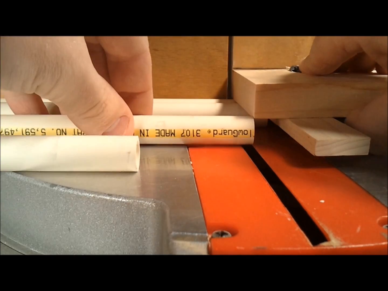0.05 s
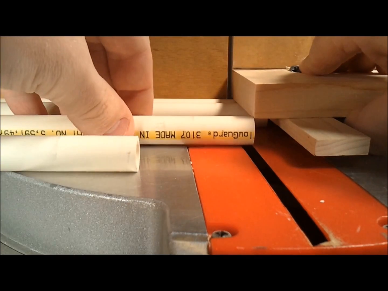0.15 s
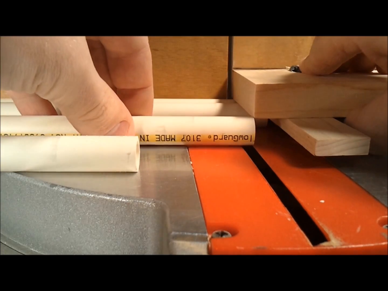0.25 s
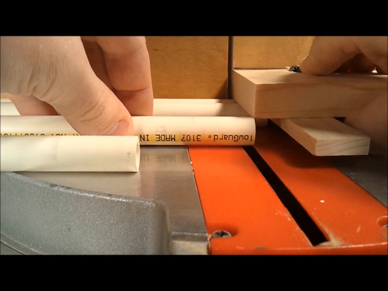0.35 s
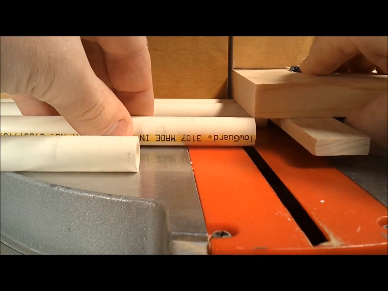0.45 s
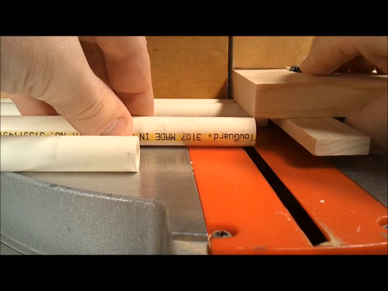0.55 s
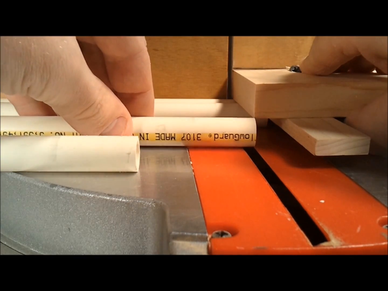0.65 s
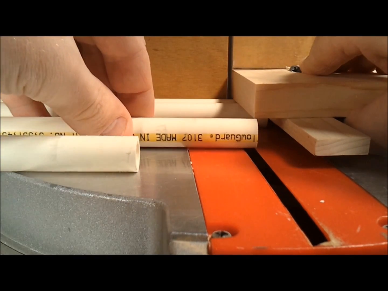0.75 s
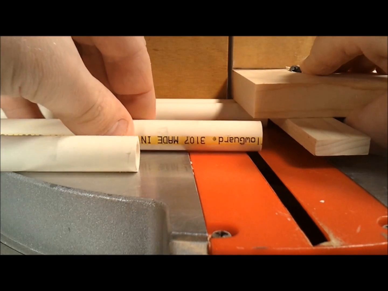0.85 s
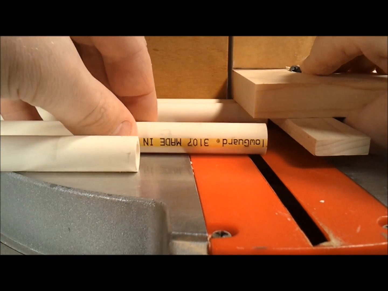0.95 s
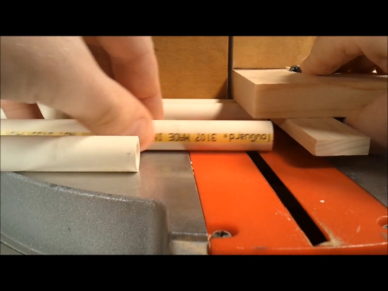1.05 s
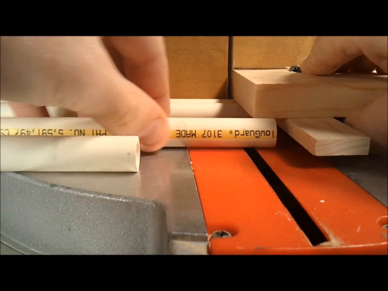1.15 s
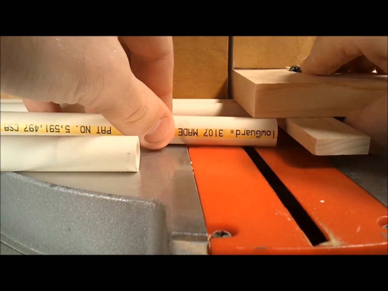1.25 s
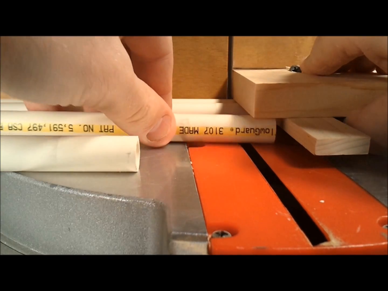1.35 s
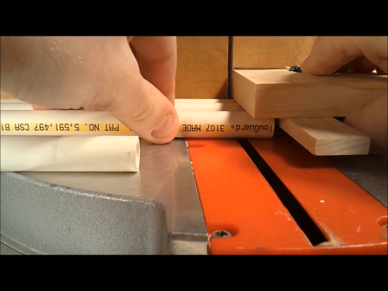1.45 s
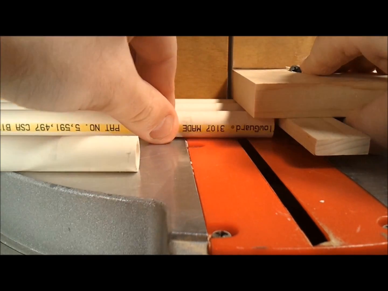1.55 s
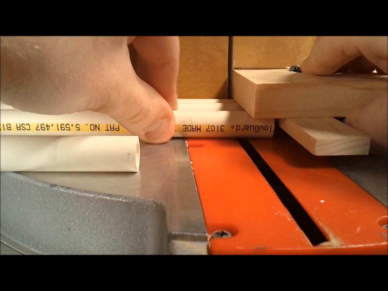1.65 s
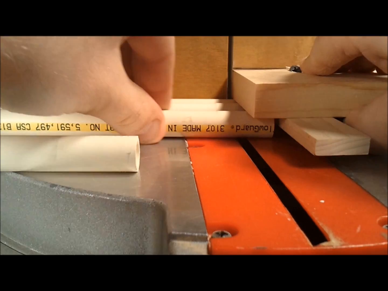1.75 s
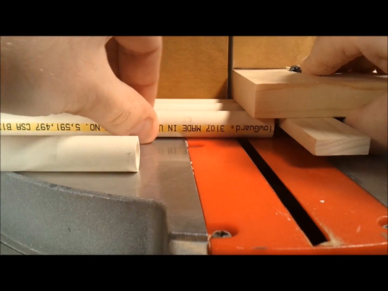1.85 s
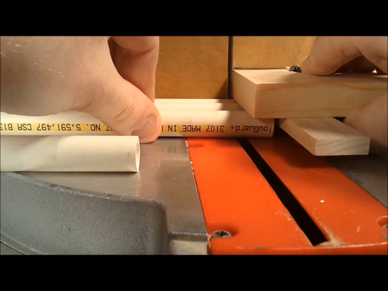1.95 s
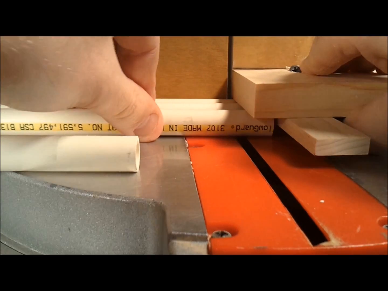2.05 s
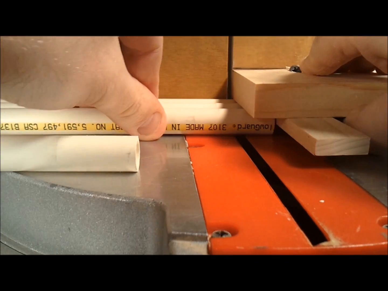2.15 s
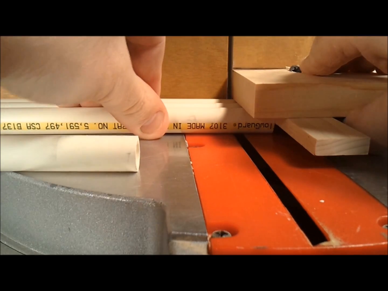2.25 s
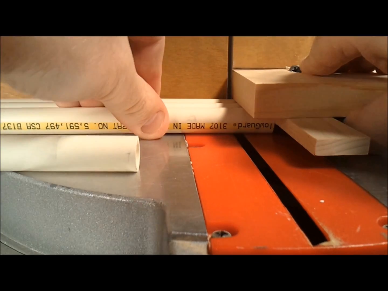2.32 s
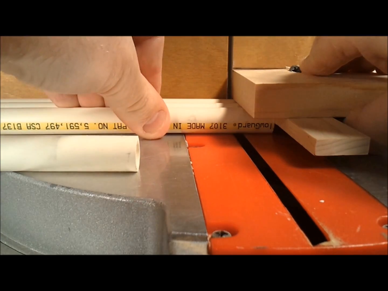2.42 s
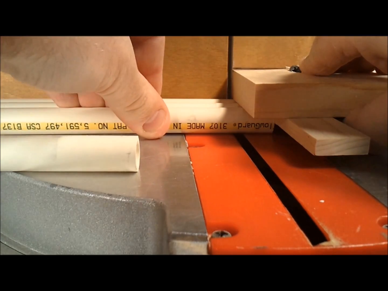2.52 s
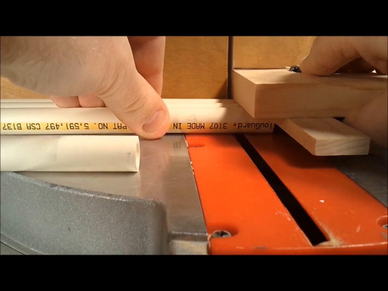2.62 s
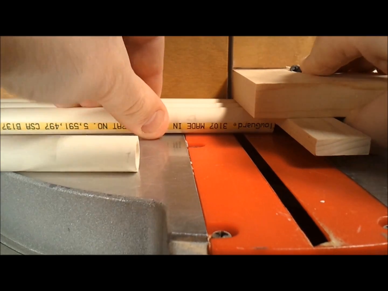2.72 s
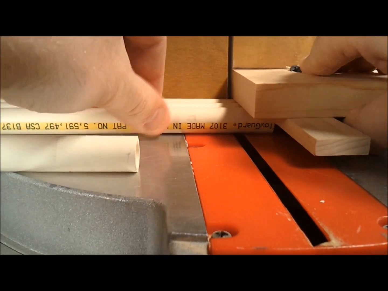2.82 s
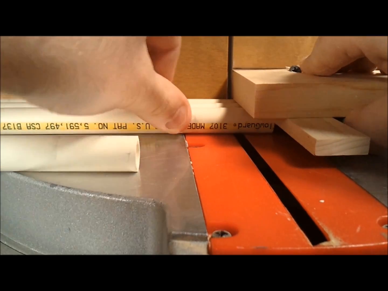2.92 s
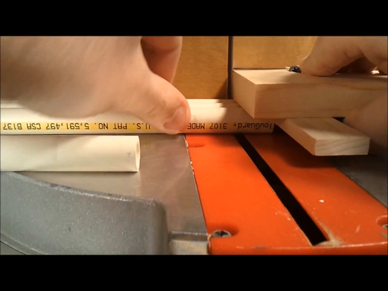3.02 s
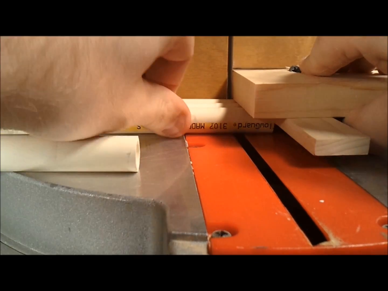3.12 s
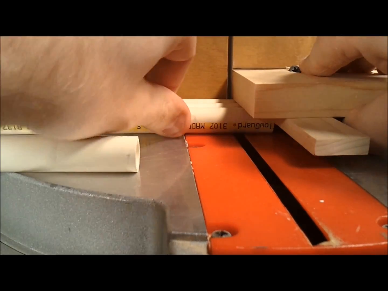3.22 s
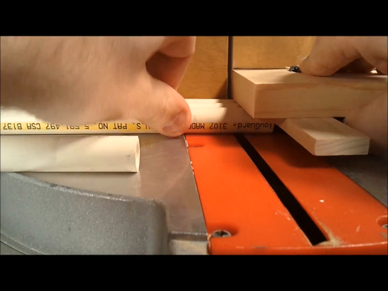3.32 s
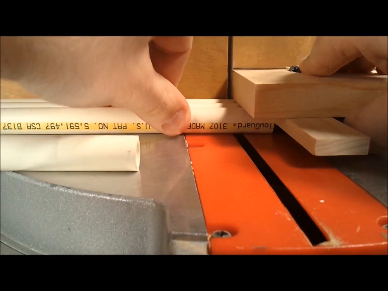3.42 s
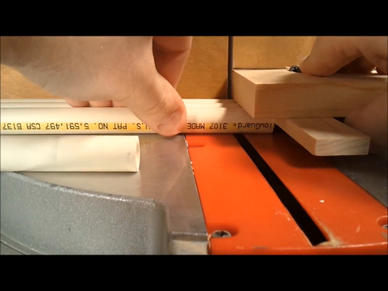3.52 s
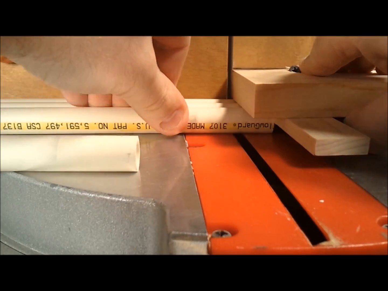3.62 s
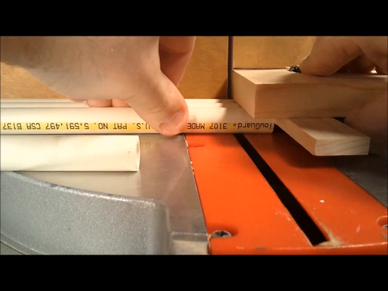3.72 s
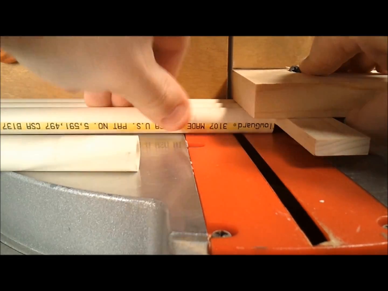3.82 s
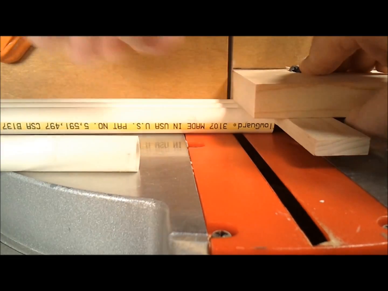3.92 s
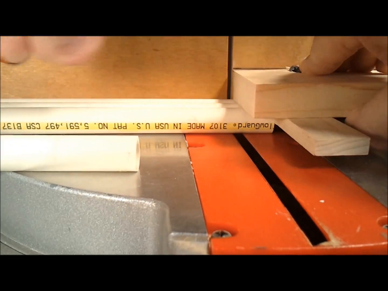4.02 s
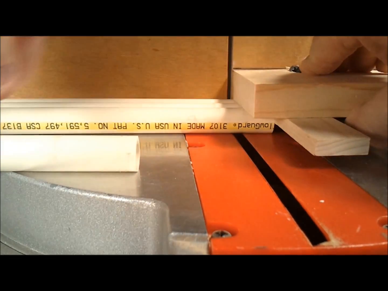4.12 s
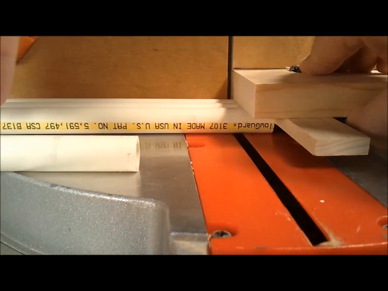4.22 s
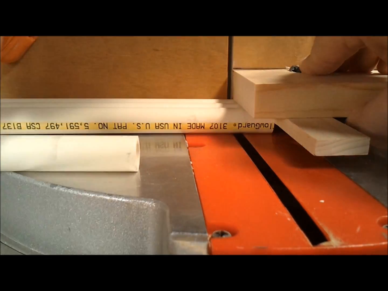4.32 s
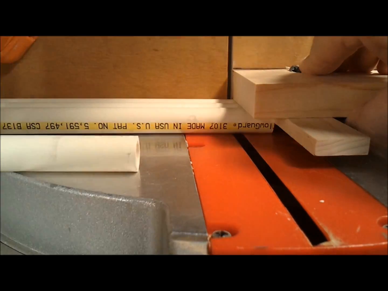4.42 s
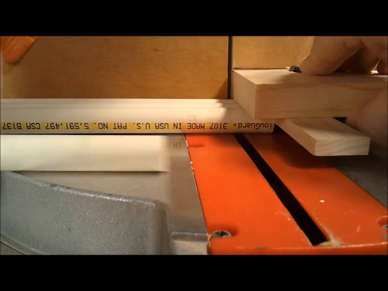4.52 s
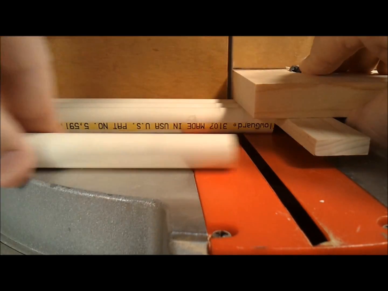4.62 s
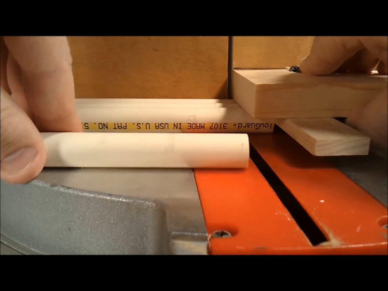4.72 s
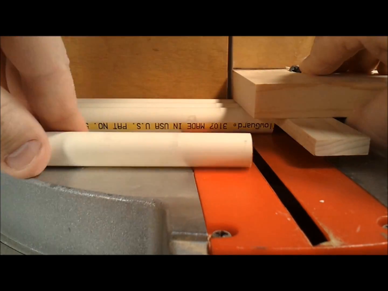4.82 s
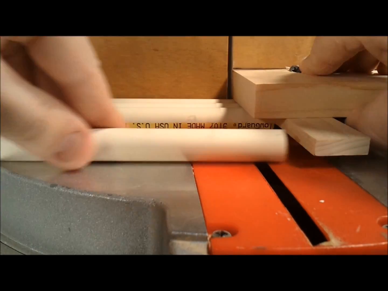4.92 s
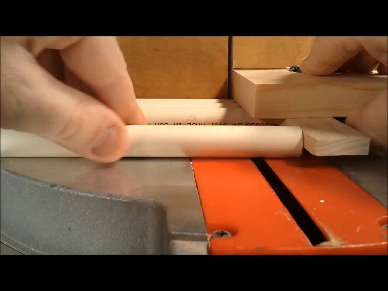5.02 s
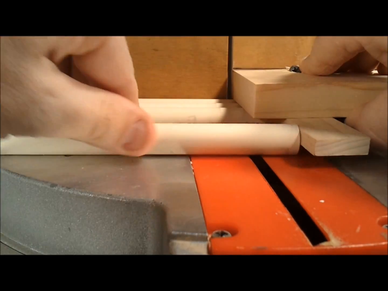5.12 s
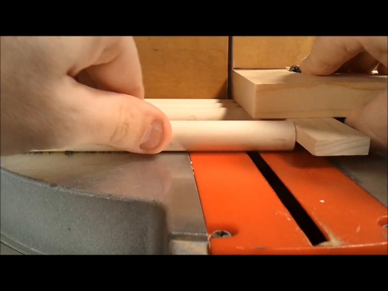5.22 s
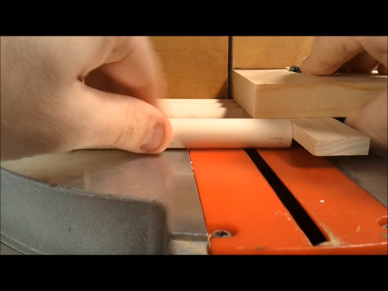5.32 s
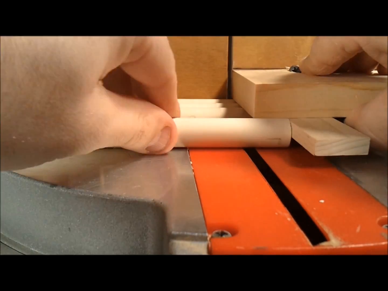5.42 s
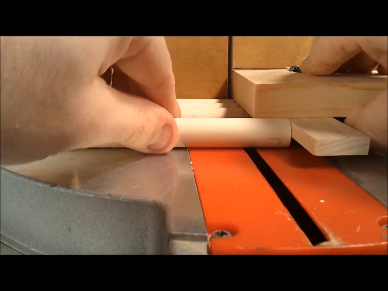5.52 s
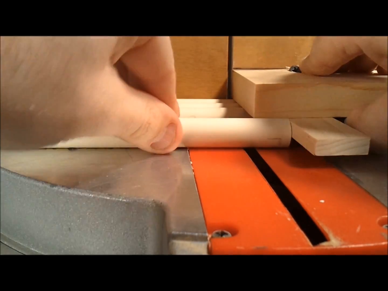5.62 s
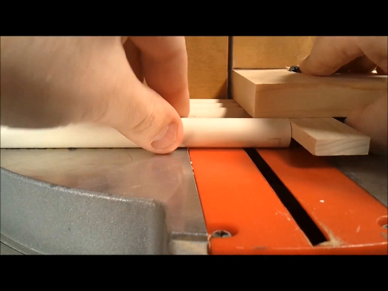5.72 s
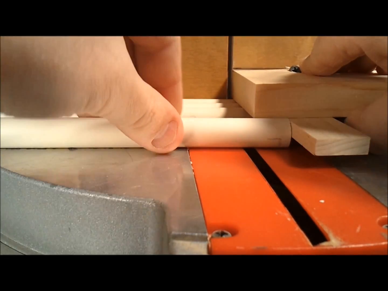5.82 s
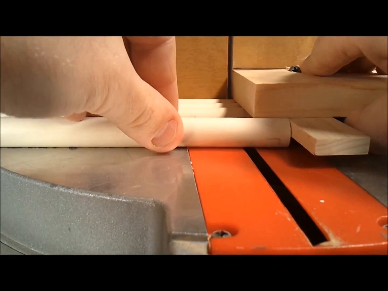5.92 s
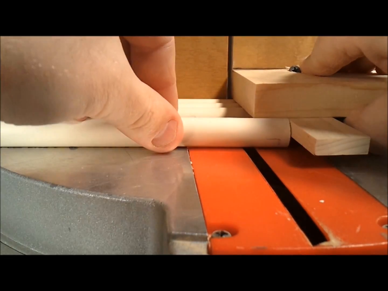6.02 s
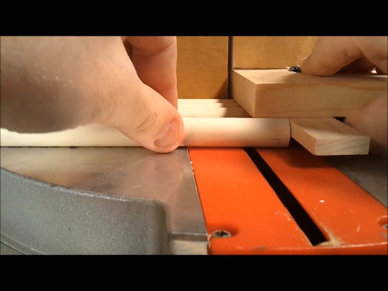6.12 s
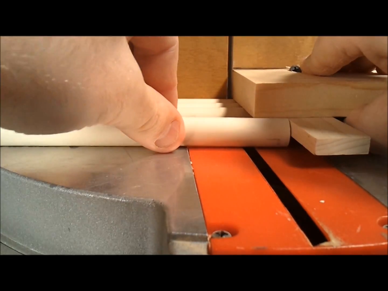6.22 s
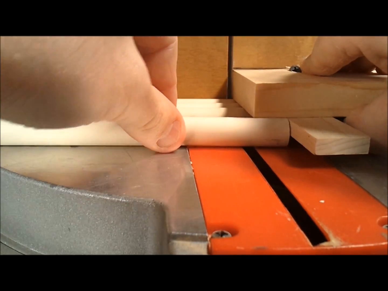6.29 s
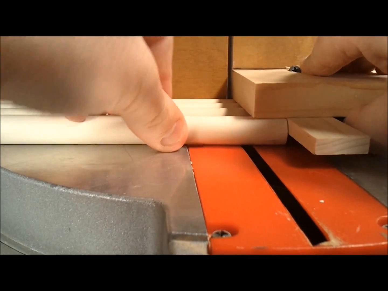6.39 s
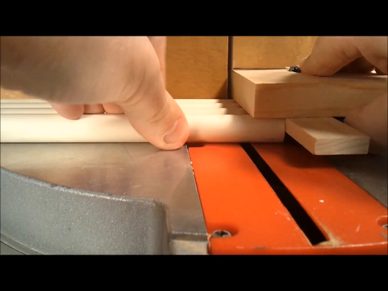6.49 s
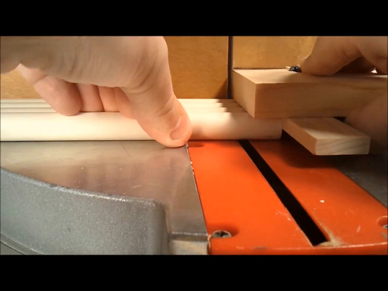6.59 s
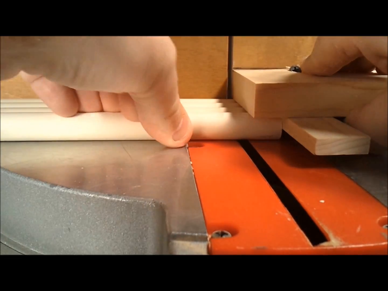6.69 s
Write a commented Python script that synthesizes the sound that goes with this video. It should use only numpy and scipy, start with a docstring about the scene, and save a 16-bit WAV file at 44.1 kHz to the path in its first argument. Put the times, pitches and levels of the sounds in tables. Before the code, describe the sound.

Close, dry handling of plastic pipes on an idle saw's steel table: faint rubs, one loud bright clack, a flurry of hissy scrapes, squeaks and hollow knocks, then sparse light taps with thin pings. After a quiet pause another pipe scrapes in with a hollow rubbing tone, lands with a duller thud, is adjusted, and finally clacks end-on against the wood. Small room, slightly dull recording, steady soft noise floor.

```python
"""In a small workshop, lengths of plastic pipe are slid by hand across the metal table of an idle saw, close
to the microphone. Each push is noise shaped as surface hiss and as slips ringing the pipe; squeaks are bands
of noise. Clacks against pipes and a wooden stop, and drops on the table, are damped modes over short noise;
the thin steel pings faintly. The room answers with decaying noise tails, over a floor of noise and low hum."""
import sys
import numpy as np
from scipy import signal
from scipy.fft import rfft, irfft, next_fast_len
from scipy.io import wavfile
from scipy.ndimage import uniform_filter1d, map_coordinates

SR = 44100
rng = np.random.default_rng(int(sys.argv[2]) if len(sys.argv) > 2 else 0)


def transcribe(signal):
    """Save signal, clipped to [-1, 1], as a 16-bit WAV file at the path in sys.argv[1]."""
    frames = np.atleast_2d(signal).T
    limited = np.clip(frames, -1, 1)
    pcm = np.round(limited * 32767).astype(np.int16)
    wavfile.write(sys.argv[1], SR, pcm)


N = 297675


def amp(db):
    """Decibels to gain."""
    return 10 ** (np.asarray(db) / 20)


def unit(x):
    """Scaled to rms 1."""
    return x / np.sqrt(np.mean(x ** 2) + 1e-20)


def along(points, hz):
    """(Hz, value) points read on a log frequency axis."""
    f, v = np.transpose(points)
    return np.interp(np.log(hz + 1), np.log(f + 1), v)


def wobble(rate):
    """A smooth random curve, rate knots a second."""
    knots = rng.standard_normal(int(N * rate / SR) + 4)
    return map_coordinates(knots, [np.arange(N) * rate / SR])


def filtered(x, response):
    """x times a response of frequency."""
    m = next_fast_len(len(x) + SR // 10)
    hz = np.fft.rfftfreq(m, 1 / SR)
    return irfft(rfft(x, m) * response(hz), m)[:len(x)]


def coloured(x, spectrum):
    """x with a (Hz, dB) spectrum, at rms 1."""
    return unit(filtered(x, lambda hz: amp(along(spectrum, hz))))


def add(track, s, sound):
    """Mixes a sound into the track at a time in seconds."""
    part = track[round(s * SR):][:len(sound)]
    part += sound[:len(part)]


def background():
    """Steady room noise with a weak electrical hum whose partials waver in phase."""
    # Partials of the hum. Each row: frequency in Hz, rms level in dB.
    hum_partials = [(120, -87.5), (180, -88), (258, -86), (360.7, -83)]
    # Spectrum of the room noise. Each row: frequency in Hz, relative level in dB.
    floor_spectrum = [(20, 1.5), (50, 1.5), (140, 1.5), (400, 0.5), (650, -3), (1000, -6.5), (2000, -9.5),
                      (4000, -13.5), (7000, -14)]
    floor_db = -60
    t = np.arange(N) / SR
    hum = np.zeros(N)
    for hz, db in hum_partials:
        hum += amp(db) * np.sqrt(2) * np.sin(2 * np.pi * hz * t + .6 * wobble(4))
    return hum + amp(floor_db) * coloured(rng.standard_normal(N), floor_spectrum)


def asperities(rate, spread_db, smooth_db):
    """Tiny slips of unequal size, rate a second on average, over the smooth rub of the surface."""
    happens = rng.random(N) < rate / SR
    sizes = rng.standard_normal(N) * amp(spread_db * rng.standard_normal(N))
    return unit(happens * sizes) + amp(smooth_db) * rng.standard_normal(N)


def rubbed(resonances):
    """Tiny slips ringing a pipe, at rms 1; the resonances drift as the contact and the grip move."""
    def tube(f):
        response = 0
        for k, (centre, width, db) in enumerate(resonances):
            resonance = 1j * f * width / (centre * centre - f * f + 1j * f * width)
            response = response + (-1) ** k * amp(db) * resonance  # neighbours in opposite phase
        return response

    ringing = filtered(asperities(rate=700, spread_db=3, smooth_db=-4), tube)
    # reading the sound slightly fast or slow, by about 1 %, moves every resonance together
    drift = np.cumsum(.011 * wobble(16))
    return unit(map_coordinates(ringing, [np.arange(N) + drift], order=3, mode="reflect"))


def patchy(x, depth_db):
    """The colour of a rub shifts from one spot of the surface to the next."""
    z = signal.stft(x, nperseg=512)[2]
    field = uniform_filter1d(rng.standard_normal(z.shape), 5, 0)  # smooth across frequency
    field = uniform_filter1d(field, 7, 1)  # and along time
    patched = signal.istft(z * amp(depth_db * unit(field)), nperseg=512)[1]
    return unit(patched[:N])


def push(t, length, swell_db):
    """Level of one push: it gathers speed, swells or fades evenly, and dies away once the hand eases off."""
    get_going_s, come_to_rest_s = .0115, .018
    going = 1 / (1 + np.exp(-t / get_going_s))
    swell = amp(swell_db * (np.clip(t / length, 0, 1) - .5))
    resting = np.exp(-np.maximum(t - length, 0) / come_to_rest_s)
    return going * swell * resting


def sliding():
    """The pipe scrapes with each push: the contact hisses and the hollow length resonates."""
    # Pushes of the hand. Each row: start in seconds, length in seconds, surface hiss in dB, pipe body in dB,
    # swell from start to end in dB; both levels are before the trims and the unsteady grip.
    strokes = [(0.15, .07, -60, -60.5, 10), (0.555, .05, -61.5, -60.5, 0), (0.681, .012, -46, -46, 0),
               (0.793, .135, -48.2, -47.8, -2), (0.98, .07, -52.5, -52, 0), (1.063, .055, -43.7, -47, -5),
               (1.2, .09, -43, -55, -2), (1.335, .105, -42.5, -57.5, 2), (1.47, .13, -50.3, -57, -6),
               (1.68, .16, -57.5, -68, -2), (2.037, .05, -45.5, -60, 2), (2.12, .125, -53, -57.5, 2),
               (2.76, .13, -59.3, -63, -4), (3.465, .025, -58.5, -72, 0), (3.74, .07, -61, -68, 3),
               (4.436, .094, -49.5, -51.5, 17), (4.602, .047, -43.5, -44.3, 4),
               (4.715, .012, -52, -39.5, 0), (4.808, .162, -47.5, -45.3, 3), (5, .285, -52.3, -46.7, 0),
               (5.29, .018, -56, -42, 0), (5.36, .14, -57, -60.5, -6), (5.62, .16, -62.3, -76, -5),
               (5.845, .05, -58, -53.5, 0), (6.315, .042, -47, -51.5, 2), (6.4, .08, -42.8, -49, 7),
               (6.51, .11, -54, -68, -10)]
    # Spectrum of the surface hiss. Each row: frequency in Hz, relative level in dB.
    hiss_spectrum = [(200, -38), (1000, 0.5), (2400, -3), (3200, -2.5), (3900, -2), (4700, -1), (5200, 0.5),
                     (5700, 4), (6800, 8), (7500, -9.5)]
    # Resonances that rubbing excites, by how the pipe lies and is held: a first pipe, the picking up of
    # another, and the second pipe. Each row: frequency in Hz, width in Hz, relative level in dB.
    first_pipe = [(288, 110, -12), (432, 70, -9.5), (567, 73, -5.5), (903, 45, 0.5), (979, 60, 0),
                  (1144, 48, -0.5), (1743, 98, -7), (2026, 57, -9.5), (3550, 76, -12), (4630, 130, -7.5),
                  (5570, 200, -13)]
    picking_up = [(290, 130, -22), (813, 96, -9), (982, 75, 1.5), (1160, 130, -5.5), (1516, 70, -6),
                  (1680, 49, -3.5), (1970, 170, -6), (2264, 300, -17.5), (3230, 66, -16.5),
                  (4190, 150, -15)]
    second_pipe = [(165, 67, -7.5), (270, 81, -2.5), (450, 14, 3.5), (664, 91, -3.5), (798, 59, 1.5),
                   (943, 120, 1.5), (1450, 270, -14), (2044, 39, -7.5), (2510, 53, -6.5), (3200, 93, -14)]
    first_until_s, picking_up_until_s = 4.2, 5.03
    let_go_s, held_again_s = 3.85, 4.4
    hiss_trim_db, body_trim_db = -.7, -2.7
    t = np.arange(N) / SR
    local = np.arange(-SR // 8, SR // 2) / SR

    # between pushes the held pipe still shifts a little
    held = (t < let_go_s) | (t > held_again_s)
    fidget = amp(2.5 * wobble(9)) * held
    hiss_power = (amp(-71) * fidget) ** 2
    body_power = (amp(-73) * fidget) ** 2
    for s, length, hiss_db, body_db, swell_db in strokes:
        stroke = push(local, length, swell_db)
        add(hiss_power, s + local[0], (amp(hiss_db) * stroke) ** 2)
        add(body_power, s + local[0], (amp(body_db) * stroke) ** 2)

    grip_db = 1.7 * wobble(70)  # shared by hiss and body
    which = np.searchsorted((first_until_s, picking_up_until_s), t)
    body = np.choose(which, [rubbed(first_pipe), rubbed(picking_up), rubbed(second_pipe)])
    hiss = coloured(asperities(rate=1800, spread_db=0.5, smooth_db=4.5), hiss_spectrum)
    body_sound = np.sqrt(body_power) * amp(grip_db + body_trim_db) * patchy(body, depth_db=2.5)
    hiss_sound = np.sqrt(hiss_power) * amp(grip_db + hiss_trim_db) * patchy(hiss, depth_db=2.0)
    return body_sound + hiss_sound


def ring(modes, t):
    """Damped (Hz, dB, t60 s) modes, struck at new strengths and phases each time."""
    out = np.zeros(len(t))
    for hz, db, t60 in modes:
        level = amp(db + 2 * rng.standard_normal() - 60 * t / t60)
        out += level * np.sin(2 * np.pi * (hz * t + rng.random()))
    return out


def struck(modes, spectrum, t, attack, t60, dense_db):
    """Clear modes over a noisy crowd of short-lived ones, with the energy of 10 ms at rms 1."""
    clear = ring(modes, t) / np.linalg.norm([amp(db) for _, db, _ in modes])
    crowd = coloured(rng.standard_normal(len(t)), spectrum) * amp(dense_db - 60 * t / t60)
    sound = (clear + crowd) * (1 - np.exp(-t / attack))
    return sound / np.sqrt(np.sum(sound ** 2) / (SR / 100))


def favoured(rows, near_hz, boost_db, octaves):
    """A blow excites most the modes that swing widest at the point of contact."""
    out = []
    for hz, db, *rest in rows:
        distance = np.log2(hz / near_hz) / octaves
        out.append((hz, db + boost_db / (1 + distance ** 2), *rest))
    return out


def knocks():
    """The pipe's edge cracks first; its wall, its length and the heavy table follow ever more slowly.

    The way of touching shares the blow among them; a brighter blow favours the edge over the table."""
    # Contacts. Each row: start in seconds, strength in dB, brightness in dB, frequency in Hz favoured by the
    # point of contact, way of touching.
    contacts = [(0.002, -48.5, 0, 964, "thump"), (0.3823, -40.7, -3.5, 910, "tap"),
                (1.1, -44, 0, 996, "thump"), (1.1728, -22.3, 1.9, 807, "clack"),
                (1.1838, -30, 0, 1147, "tap"), (1.236, -36.3, -1, 964, "bump"),
                (1.3277, -46, 0, 1147, "tick"), (1.4052, -39.5, .5, 953, "bump"),
                (1.419, -35.5, -3, 958, "end on"), (1.4284, -31, 0, 1760, "end on"),
                (1.435, -41, 0, 964, "thump"), (1.586, -51, 3, 856, "bump"), (1.6303, -36.7, 5, 904, "tap"),
                (1.657, -39.5, 0, 964, "thump"), (1.7025, -43, -3, 969, "tap"),
                (1.9305, -45.5, .5, 1400, "bump"), (1.941, -44.5, 0, 1141, "thump"),
                (2.0819, -42.5, 1.7, 2000, "tap"), (2.243, -51.5, -3.5, 964, "bump"),
                (2.9874, -45.3, .5, 1660, "tap"), (3.273, -59.5, 0, 883, "tick"),
                (4.301, -61.5, 3, 797, "tick"), (4.988, -31.5, 0, 791, "drop"),
                (5.212, -45, 0, 926, "bump"), (5.3328, -36.7, -3.3, 791, "clack"),
                (6.4782, -37.5, 3, 1157, "clack"), (6.4888, -29.7, 0, 1100, "end on")]
    # Ways of touching. Each row: table thud, pipe body, pipe wall and edge crack in dB relative to the blow,
    # contact time in seconds, frequency in Hz favoured in the wall.
    touches = {"clack": (-10.5, 0, -5.3, 2, .0003, 2900), "end on": (-7.5, 0, 3, 6.9, .00012, 3400),
               "tap": (-5.5, 0, -1.5, -6, .00027, 2300), "bump": (.5, 0, -3.7, -6.3, .0018, 2900),
               "drop": (6.5, 0, -15, 0, .0003, 2300), "tick": (-12, -10, -14, 0, .0003, 3200),
               "thump": (0, -20, -32, -34, .005, 2400)}
    # Modes of the table, the pipe's length, its wall and its edge, and of the wooden stop (level relative
    # to the blow). Each row: frequency in Hz, level in dB, t60 in seconds.
    table_modes = [(160, -10, .25), (216.7, -5.5, 0.29), (268, 4, 0.13), (306, 0, .22), (338, 2, .2),
                   (439.3, 1, 0.29), (526, -4.5, 0.15), (619, -7.5, .22), (685, -5.5, .18)]
    body_modes = [(740.6, -7, 0.083), (813, -2.5, 0.083), (911, -3.5, 0.12), (972, 1, 0.11),
                  (1150, 3, 0.11), (1442, -10, .08), (1614, -3, .1), (1636, 1, 0.061), (1750, -6.5, .07),
                  (2027, -3, 0.055)]
    wall_modes = [(2410, -11.5, 0.043), (2775, -4, 0.06), (2950, 2.5, 0.046), (3260, -5.5, 0.031),
                  (3570, -11.5, 0.059), (3980, -15, .03)]
    edge_modes = [(4860, 0, 0.041), (5110, -21, 0.036), (5140, -8.5, 0.07), (5950, -2.5, 0.028),
                  (5700, -15, .11), (6560, -8, 0.17), (6500, 0, 0.071), (6210, -3, 0.089),
                  (7130, -11, 0.12)]
    stop_modes = [(72, -28, .25), (108, -24, .22), (140, -22.5, .2)]
    # Broad response between the modes of table, length, wall and edge, and the first instant of a hard
    # contact. Each row: frequency in Hz, relative level in dB.
    thud_spectrum = [(50, -29.5), (120, -16.5), (200, -4), (330, -9), (680, -3.5), (1000, -16.5),
                     (2500, -63)]
    clack_spectrum = [(200, -32), (520, -13.5), (800, -1.5), (1150, -0.5), (1400, -5.5), (1650, -4.5),
                      (2100, -6), (3200, -20), (8000, -52.5)]
    snap_spectrum = [(600, -43.5), (1700, -12), (2400, -5), (3000, -3), (4000, -4), (5200, -12.5),
                     (8000, -42.5)]
    crack_spectrum = [(1000, -43), (3300, -20), (4700, 4.5), (5500, 4.5), (6800, -1), (8000, -15.5)]
    tick_spectrum = [(800, -23.5), (2000, -5.5), (3000, 0), (5200, -1.5), (7000, -4.5), (8000, -15)]
    brightness_shares = np.array([-.4, 0, .55, 1])  # of thud, body, wall, edge
    out, t = np.zeros(N), np.arange(SR // 2) / SR
    for s, db, bright_db, near_hz, touch in contacts:
        *shares_db, contact, wall_hz = touches[touch]
        thud_db, body_db, wall_db, edge_db = db + np.array(shares_db) + bright_db * brightness_shares
        modes = favoured(body_modes, near_hz, boost_db=8.5, octaves=.08)
        colour = favoured(clack_spectrum, near_hz, boost_db=8.5, octaves=0.33)
        snap = favoured(snap_spectrum, wall_hz, boost_db=7, octaves=.35)
        thud = struck(table_modes, thud_spectrum, t, attack=contact + .0025, t60=.08, dense_db=3)
        thud *= amp(thud_db - 1)
        body = struck(modes, colour, t, attack=contact + 0.0021, t60=0.057, dense_db=4)
        body *= amp(body_db - .5)
        wall = struck(wall_modes, snap, t, attack=contact, t60=0.036, dense_db=4)
        wall *= amp(wall_db - 1.5)
        edge = struck(edge_modes, crack_spectrum, t, attack=contact, t60=.03, dense_db=9.5)
        edge *= amp(edge_db - 1)
        # the harder (shorter) the contact, the sharper this first tick
        tick = coloured(rng.standard_normal(len(t)), tick_spectrum)
        tick *= amp(edge_db + 11 - 60 * t / 0.0075) * (1 - np.exp(-t / contact))
        add(out, s, thud + body + wall + edge + tick)
        add(out, s + .027, amp(-10) * thud)  # the thud comes back from a wall
        if touch == "end on":  # a blow end on also shakes the wooden stop
            add(out, s, amp(db) * ring(stop_modes, t) * (1 - np.exp(-t / .003)))
    return out


def workshop(x):
    """Reflections off the saw, bench and walls; a new tail each quarter second, as pipes and hands move."""
    # Reverberation of the workshop. Each row: frequency in Hz, t60 in seconds.
    shop_t60 = [(150, 0.71), (400, 0.48), (1000, .3), (3200, 0.4), (7000, 0.27)]
    out, step = np.zeros(N), SR // 4
    for start in range(0, N, step):
        hz, t, z = signal.stft(rng.standard_normal(SR * 2 // 3), SR, nperseg=256)
        t60 = along(shop_t60, hz)[:, None]
        decay = amp(-60 * t / t60) * (1 - np.exp(-t / 0.0036))
        tail = signal.istft(z * decay, SR, nperseg=256)[1]
        tail /= np.linalg.norm(tail)
        add(out, start / SR, signal.fftconvolve(x[start:start + step], tail))
    return out


def squeaks_and_last_ringing():
    """Swells of band noise: rough squeaks and rasps of the plastic, and the pipe ringing after the last knock."""
    # Squeaks and rasps of the plastic, and the pipe's ringing near 3.3 kHz after the last knock. Each row:
    # centre in seconds, half length in seconds (standard deviation of the bell-shaped level), frequency
    # in Hz, width in Hz, level in dB.
    swells = [(1.106, .008, 1070, 200, -40.5), (1.335, .0066, 7100, 347, -42.5),
              (1.375, .03, 6680, 403, -40), (2.21, .011, 6550, 300, -55), (4.522, .024, 5460, 300, -46.5),
              (4.528, .01, 6770, 606, -40), (4.635, .028, 6230, 454, -47), (4.645, .022, 5720, 150, -47),
              (5.129, .029, 2960, 700, -57.5), (5.27, .03, 7030, 300, -53), (6.418, .05, 7000, 705, -51.5),
              (6.553, .04, 3270, 1200, -52)]
    out, t = np.zeros(N), np.arange(-SR // 4, SR // 4) / SR
    for s, half, centre_hz, width_hz, db in swells:
        noise = rng.standard_normal(len(t))
        band = filtered(noise, lambda hz: 1 / (1 + (2 * (hz - centre_hz) / width_hz) ** 2))
        add(out, s + t[0], amp(db) * unit(band) * np.exp(-.5 * (t / half) ** 2))
    return out


def pings():
    """Thin steel rings on in a few close modes after a light touch."""
    # The steel pings where a pipe catches it. Each row: start in seconds, level in dB.
    catches = [(2.082, -57), (2.244, -64), (2.987, -54), (4.65, -49.5)]
    # Modes of the steel. Each row: frequency in Hz, relative level in dB, t60 in seconds.
    steel_modes = [(5870, -10, 0.51), (5980, -4, 0.4), (6040, -1, 0.51), (6170, -9, .45)]
    out, t = np.zeros(N), np.arange(SR // 2) / SR
    for s, db in catches:
        add(out, s, amp(db) * ring(steel_modes, t) * (1 - np.exp(-t / 0.0026)))
    return out


def scene():
    """Knocks and scrapes close by, their reflections in the workshop, and the background."""
    hits = knocks()
    scrape = sliding() + squeaks_and_last_ringing() + pings()
    room = workshop(amp(-10) * hits + amp(-11.5) * scrape)
    return (hits + scrape + room + background())[None]


def record(dry):
    """The recorder keeps a narrow band, leaks a trace of what lies above, and sits slightly off zero."""
    top_hz, leak_top_hz, leak_db = 7450, 13000, -51
    offset = -.0068  # of full scale

    def band(hz):
        kept = 1 / np.sqrt(1 + (hz / top_hz) ** 80)
        leak = amp(leak_db) / np.sqrt(1 + (hz / leak_top_hz) ** 20)
        return kept + leak

    return filtered(dry[0], band)[None] + offset


dry = scene()
out = record(dry)
transcribe(out)
```